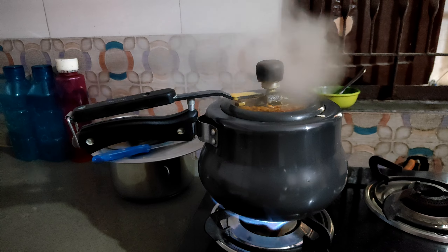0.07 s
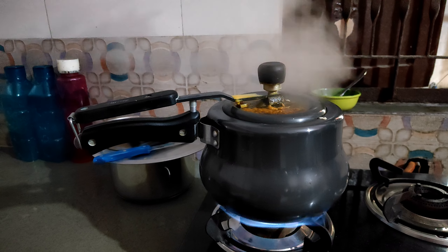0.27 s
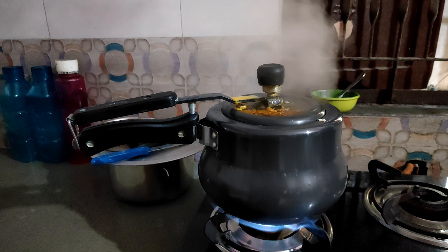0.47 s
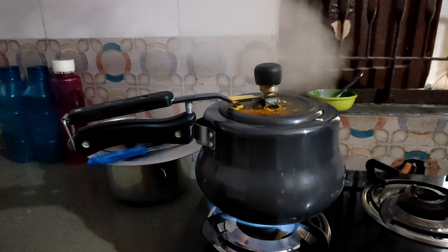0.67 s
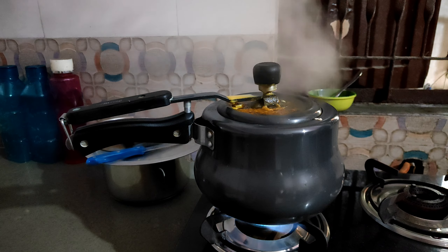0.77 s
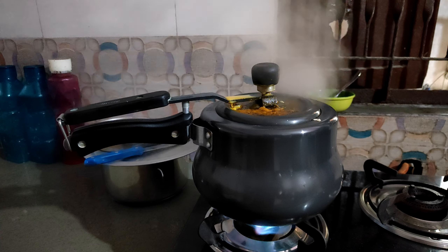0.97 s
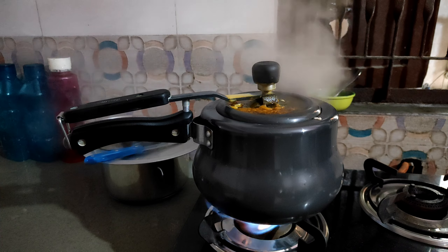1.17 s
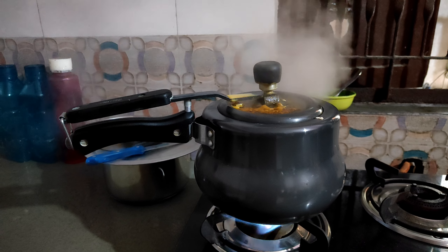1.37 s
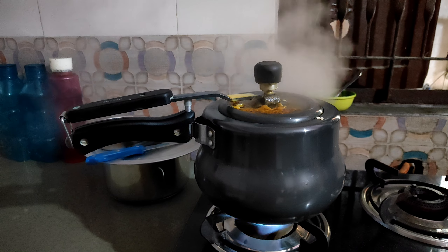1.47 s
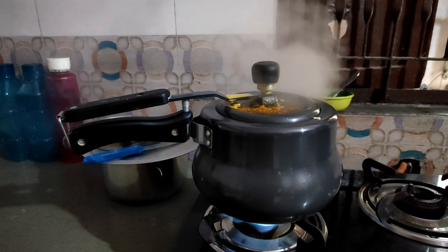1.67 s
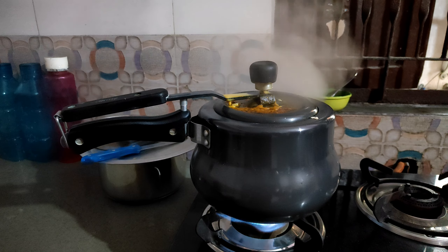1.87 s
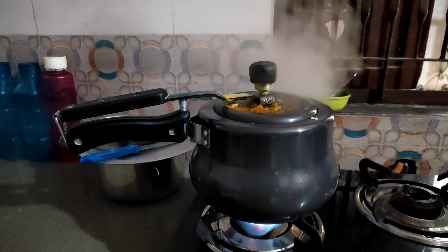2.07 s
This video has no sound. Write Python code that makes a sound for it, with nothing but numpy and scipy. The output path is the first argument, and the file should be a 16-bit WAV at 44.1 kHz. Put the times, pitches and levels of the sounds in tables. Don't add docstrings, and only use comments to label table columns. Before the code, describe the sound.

Loud, harsh high hiss of steam jetting continuously from a pressure cooker's weight valve, up close

```python
import sys
import numpy as np
from scipy import signal
from scipy.fft import rfft, irfft, next_fast_len
from scipy.io import wavfile
from scipy.ndimage import uniform_filter1d, minimum_filter1d

SR = 44100
rng = np.random.default_rng(int(sys.argv[2]) if len(sys.argv) > 2 else 0)


def ratio(d):
    e = np.asarray(d, float) / 20
    return 10 ** e


def transcribe(u):
    v = np.clip(np.atleast_2d(u).T, -1, 1)
    q = np.round(v * 32767).astype(np.int16)
    wavfile.write(sys.argv[1], SR, q)


N = 93183
TIME_S = np.arange(N) / SR
SIZE = next_fast_len(2 * N)
HZ = np.arange(SIZE // 2 + 1) * SR / SIZE + 1e-3

# t/s, level/dB
STEAM_FLOW = [(0.0, -11.5), (0.04, -18.5), (0.28, -15), (0.7, -18.5), (0.73, -21.5), (0.83, -19.5),
              (0.85, -15.5), (0.98, -18), (0.99, -18.5), (1.4, -18.5), (1.52, -18.5), (1.56, -18.5),
              (1.67, -19), (1.69, -17.5), (1.7, -20), (1.83, -19), (2.11, -18.5)]
# f/Hz, level/dB
JET_SPECTRUM = [(450, -82.5), (1650, -69.5), (2350, -59), (3100, -58), (4000, -54.5), (5000, -60.5),
                (12500, -65.5), (16000, -71.5)]
# f/Hz, level/dB
NEAR_PORT_RESPONSE = [(2800, -2.15), (3700, 3.5), (4750, -2.5), (5050, -2.5), (5500, -1.6), (8800, -2.66),
                      (10100, -15), (12000, -1)]
FAR_PORT_RESPONSE = [(3200, -3.16), (3800, -10), (5000, -4.5), (6100, -3), (7050, -10.5), (8300, -7.5),
                     (10700, -9), (12300, -1.2)]
# f/Hz, width/Hz, level/dB
NEAR_PORT_RINGS = [(6860, 980, 18.5), (6130, 120, 4.5), (6690, 110, 3.5), (3420, 73, -1.5),
                   (7540, 250, 1.5), (3200, 750, -0.5), (4470, 190, 2), (9800, 600, -10)]
FAR_PORT_RINGS = [(2440, 90, 1.7), (5800, 100, -7), (9170, 120, 6), (3240, 520, 1), (8100, 430, 2),
                  (6740, 300, -5)]
# t/s, length/s, rise of unheard top/dB, rise of draught/dB
SPITS = [(.01, 0.066, 0, 1), (0.35, 0.08, 3.5, 11), (0.538, 0.023, 5.5, 1), (0.632, 0.049, 7.5, 6.5),
         (0.866, 0.069, 4.5, 7.5), (0.932, .07, 3.5, 6), (1.112, 0.06, 3.5, 5.5), (1.27, 0.058, 4, -2),
         (1.397, .09, 4.5, -1), (1.586, 0.18, 2.5, 0), (1.95, 0.062, -5.5, 8)]


def level(x, db):
    return x * ratio(db) / np.sqrt(np.mean(x ** 2))


def colour(points, rings=()):
    hz, db = np.array(points, float).T
    base_db = np.interp(np.log(HZ), np.log(hz), db)
    ring_db = sum(d * np.exp(-((HZ - f) / w) ** 2 / 2) for f, w, d in rings)
    return ratio(base_db + ring_db)


def band(hz, width_hz):
    bell = np.exp(-((HZ - hz) / width_hz) ** 2 / 4)
    noise = rfft(rng.standard_normal(SIZE))
    return level(irfft(noise * bell)[:N], 0)


def walk(rate_hz, size=N):
    hold = int(SR / rate_hz)
    steps = np.repeat(rng.standard_normal(size // 400), hold)[:size]
    return uniform_filter1d(uniform_filter1d(steps, hold), hold) * 4 / 3


def flame():
    hz, width_hz, apart = 127, 22, 0.97
    flutter = ratio(3 * walk(11.16) - 2.6 * TIME_S)
    roar = band(hz, width_hz) + apart * np.array([band(hz, width_hz) for _ in range(2)])
    rumble = np.array([band(77, 68) for _ in range(2)])
    return level(roar * flutter, -47.5) + level(rumble * flutter, -62.5)


def kitchen(lag_s):
    room_db, t60_s, first_echo_s, direct_top_hz = 0.5, 0.29, 0.0016, 4700
    t = np.arange(SR // 2) / SR
    cloud = rng.standard_normal(len(t)) * np.exp(-np.log(1000) * t / t60_s) * (t > first_echo_s)
    cloud = cloud * ratio(room_db) / np.sqrt(np.sum(cloud ** 2))
    direct = np.exp(-2j * np.pi * HZ * lag_s) / np.sqrt(1 + (HZ / direct_top_hz) ** 2)
    return direct + rfft(cloud, SIZE)


def flow_db():
    t, db = np.array(STEAM_FLOW).T
    flow = np.interp(TIME_S, t, db)
    return flow - flow.mean()


def spits_db(column):
    return sum(row[column] * np.exp(-(2 * (TIME_S - row[0]) / row[1]) ** 4 / 2) for row in SPITS)


def sputter():
    flow = flow_db()
    top_db = 0.61 * flow + spits_db(2) + 1.24 * walk(24.55)
    top = band(20970, 460) * ratio(top_db)
    draught_db = 0.5 * flow + spits_db(3) + 0.5 * walk(13.7)
    draught = (band(0, 33.5) + 0.55 * band(0, 142)) * ratio(draught_db)
    return np.array([level(top, -13) + level(draught, -37), np.zeros(N)])


def vent():
    swell_db = 1.61 * walk(4.34, size=SIZE)
    noise = rfft(rng.standard_normal(SIZE)) * colour(JET_SPECTRUM)
    octave = np.log2(np.clip(HZ, 2 ** 8.5, 2 ** 14))
    out = 0
    for centre in np.arange(17, 29) / 2:
        share = np.cos(np.pi * np.clip(octave - centre, -.5, .5)) ** 2
        flicker_db = -1.72 * walk(10.86, size=SIZE)
        out = out + irfft(noise * share) * ratio(swell_db + flicker_db)
    return rfft(out)


def steam():
    port_lag_s = .00014
    near = far = 0
    for _ in range(5):
        jet = vent()
        near = near + jet * kitchen(0)
        far = far + jet * kitchen(port_lag_s)
    near = irfft(near * colour(NEAR_PORT_RESPONSE, NEAR_PORT_RINGS))[:N]
    far = irfft(far * colour(FAR_PORT_RESPONSE, FAR_PORT_RINGS))[:N]
    far_share, far_start_db, far_settle_s = 0.12, 5.5, 0.42
    flow = flow_db()
    near = near * ratio(flow)
    far = far * ratio(far_share * flow + far_start_db * np.exp(-TIME_S / far_settle_s))
    return np.array([level(near, -11.5), level(far, -21.5)])


def scene():
    return flame() + sputter() + steam()


def low_pass(x):
    return signal.sosfilt(signal.butter(12, 15750, fs=SR, output="sos"), x)


def record(dry):
    square_law, bass_cut_hz, top_cut_hz, ceiling = 0.17, 19, 16050, .93
    bent = dry + square_law * (dry ** 2 - np.mean(dry ** 2, axis=1, keepdims=True))
    bent = signal.sosfilt(signal.butter(1, bass_cut_hz, "high", fs=SR, output="sos"), bent)
    bent = signal.sosfiltfilt(signal.ellip(8, .1, 60, top_cut_hz, fs=SR, output="sos"), bent)
    duck = minimum_filter1d(np.minimum(1, ceiling / np.abs(bent + 1e-9)), size=129)
    duck = uniform_filter1d(uniform_filter1d(duck, size=65), size=65)
    return low_pass(bent * duck)


dry = scene()
out = record(dry)
transcribe(out)
```